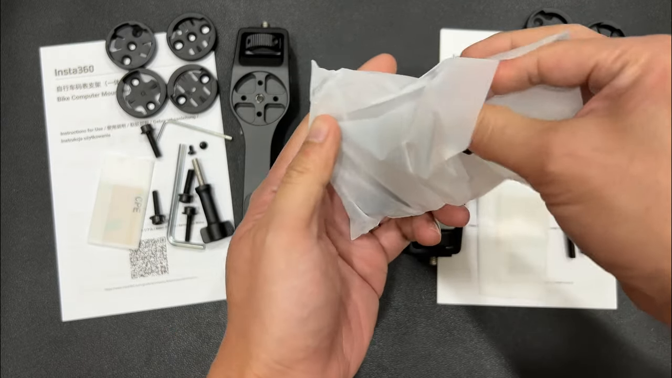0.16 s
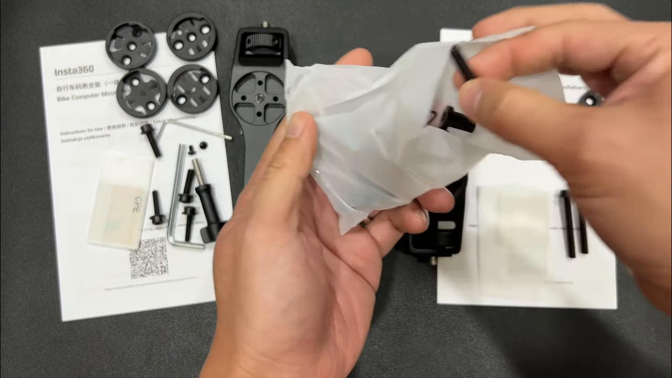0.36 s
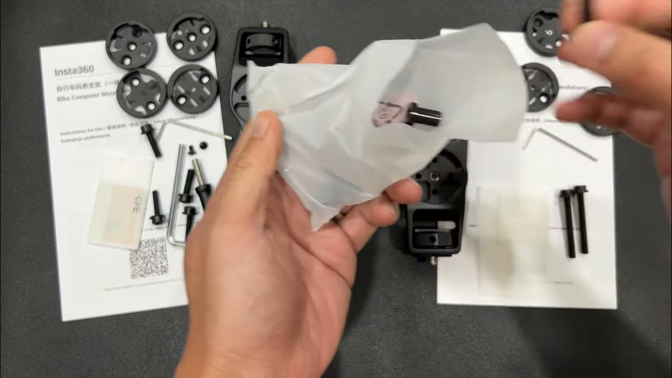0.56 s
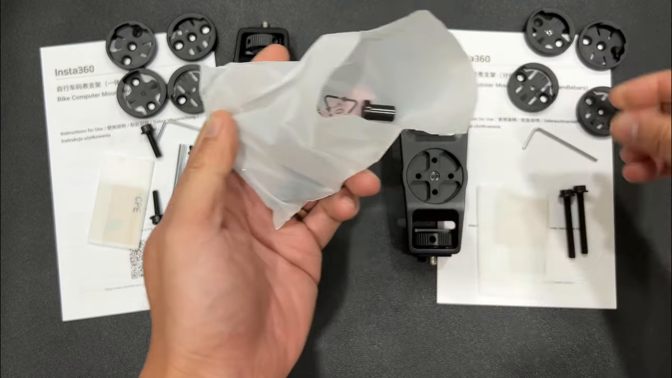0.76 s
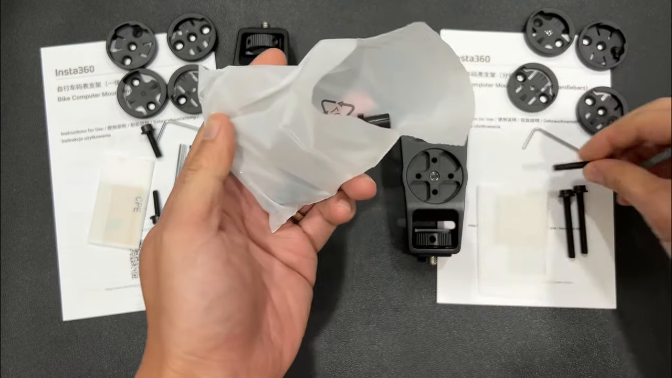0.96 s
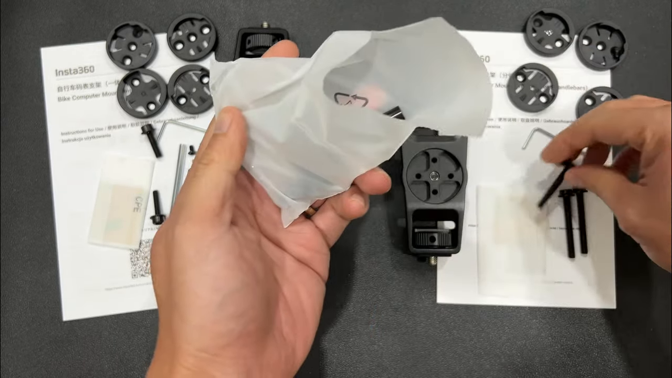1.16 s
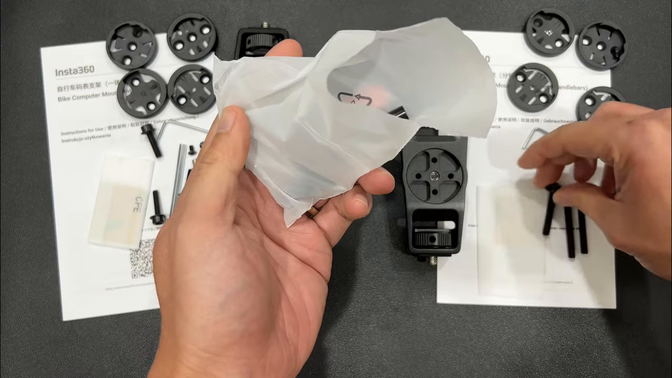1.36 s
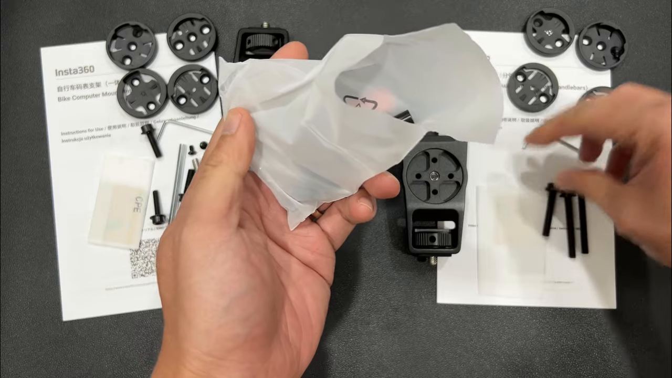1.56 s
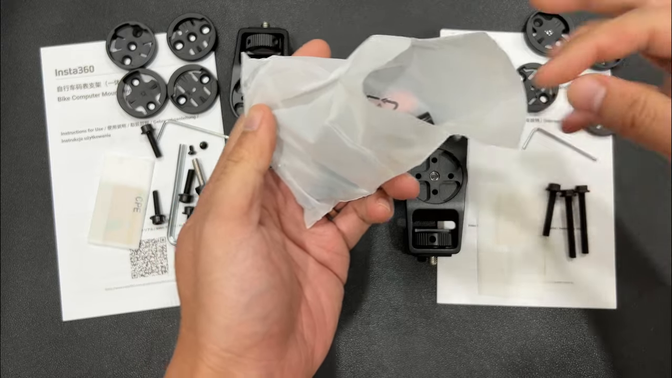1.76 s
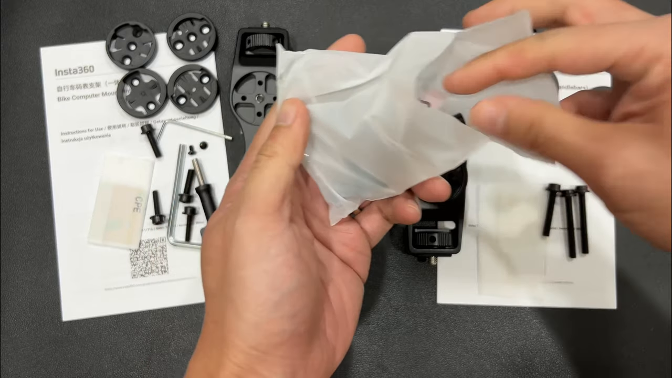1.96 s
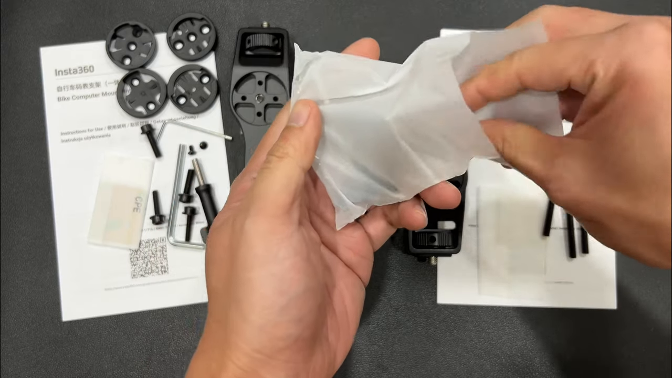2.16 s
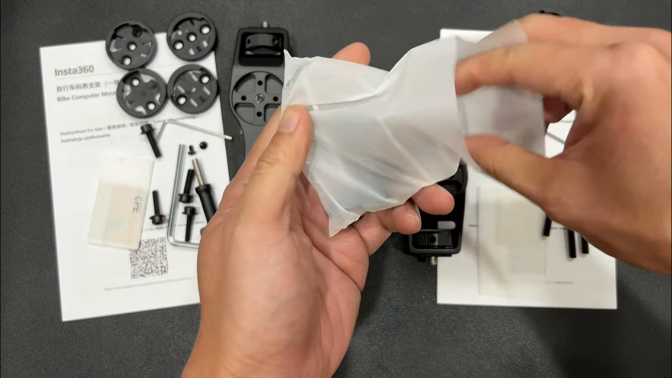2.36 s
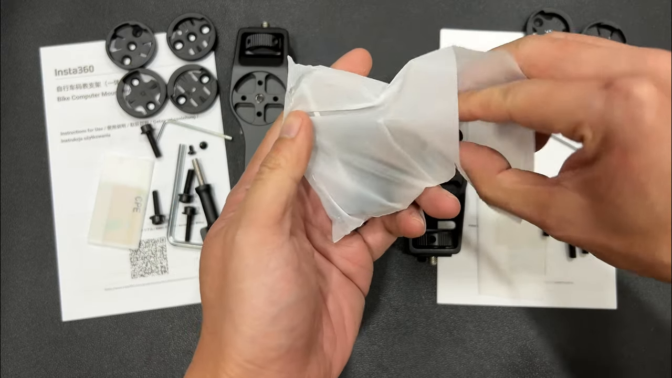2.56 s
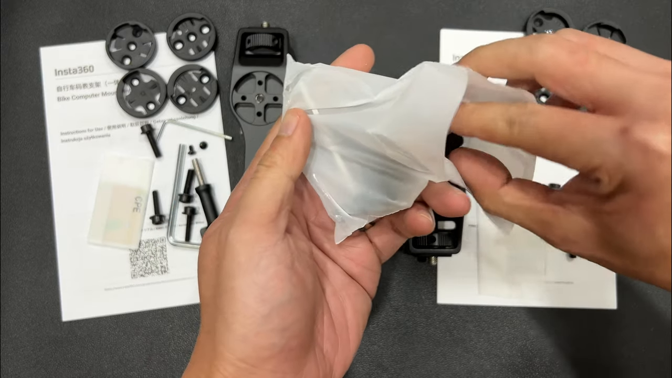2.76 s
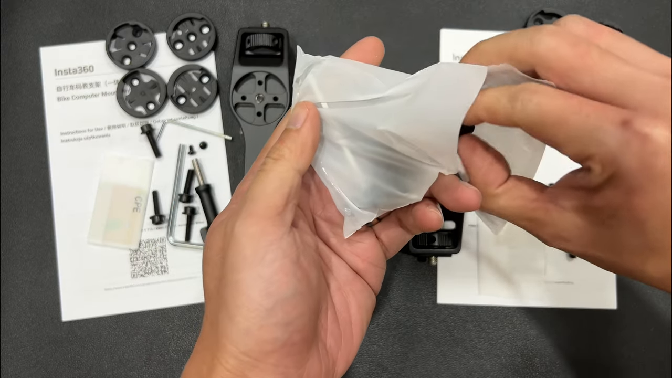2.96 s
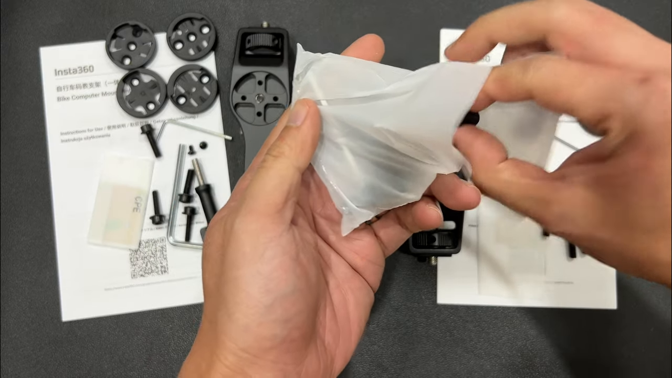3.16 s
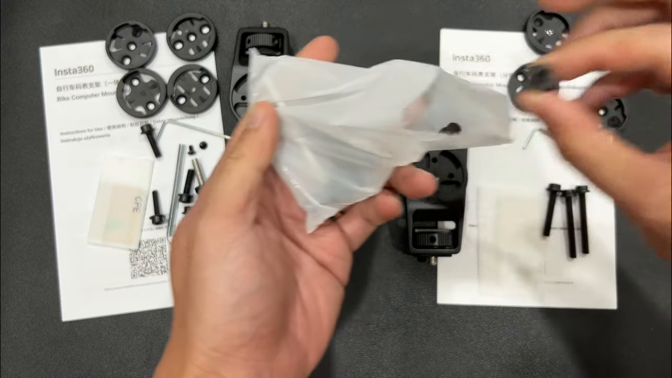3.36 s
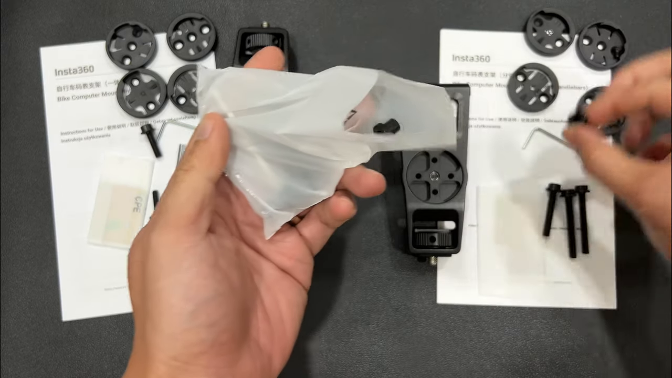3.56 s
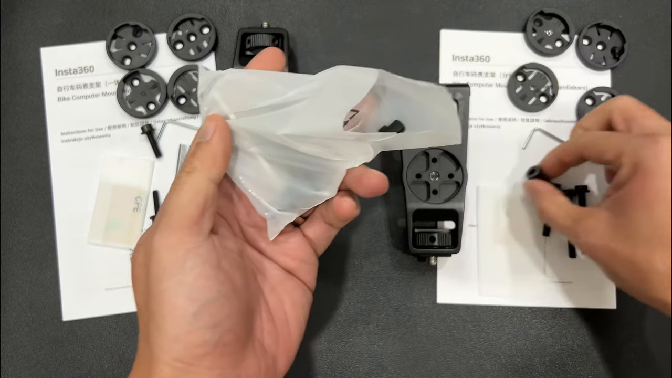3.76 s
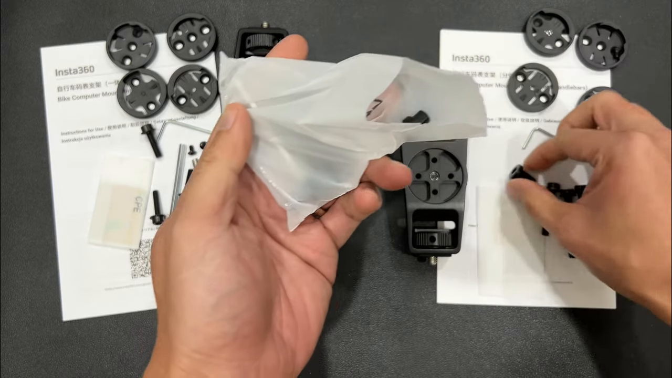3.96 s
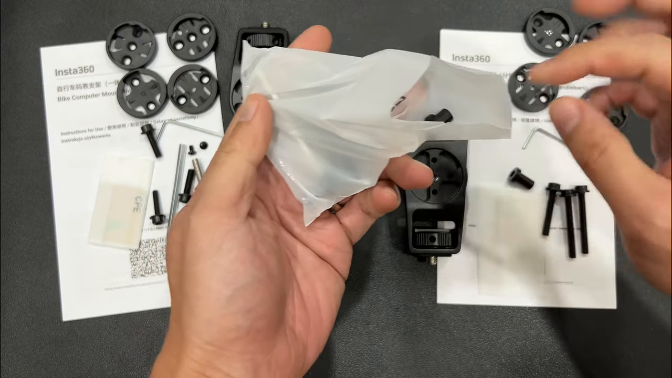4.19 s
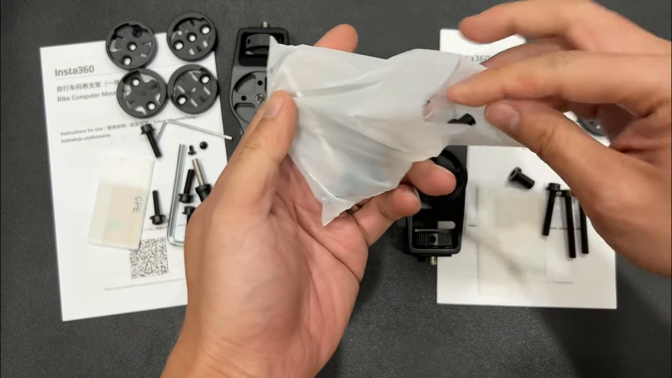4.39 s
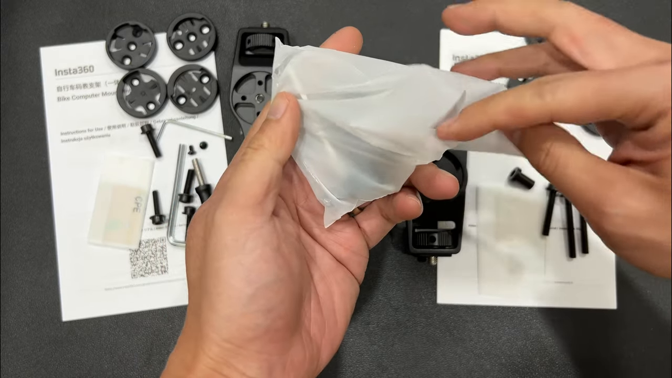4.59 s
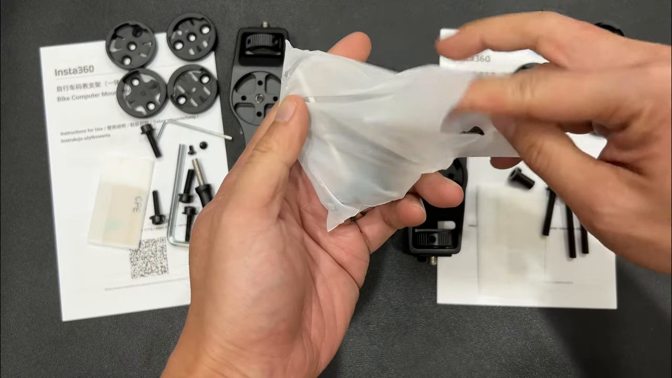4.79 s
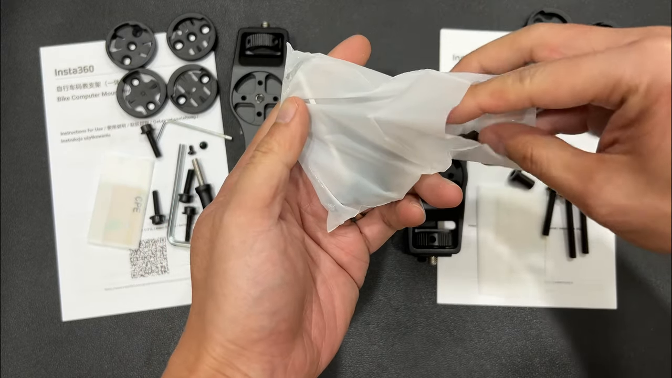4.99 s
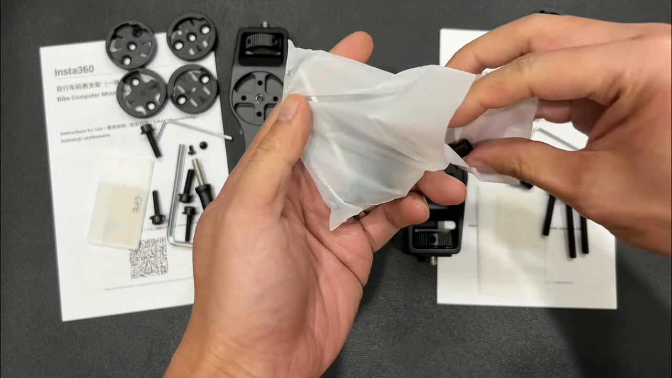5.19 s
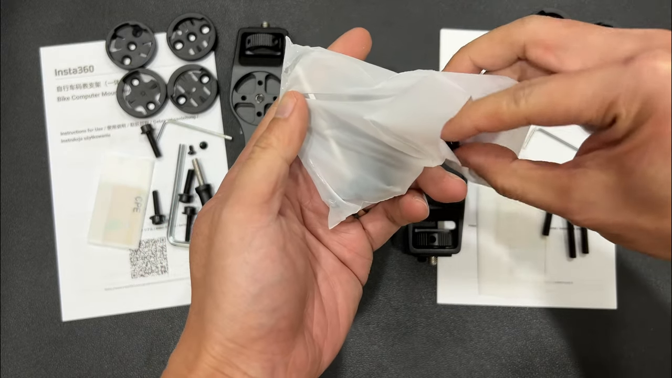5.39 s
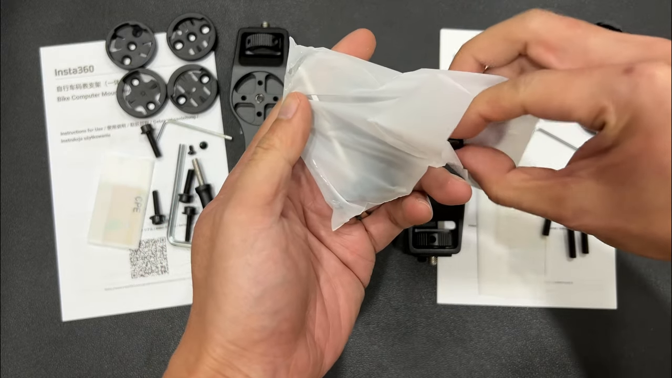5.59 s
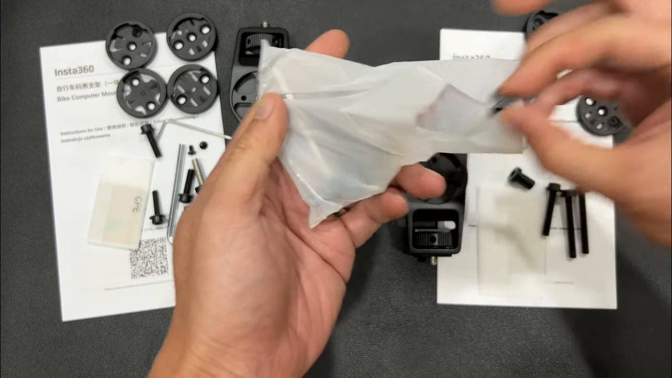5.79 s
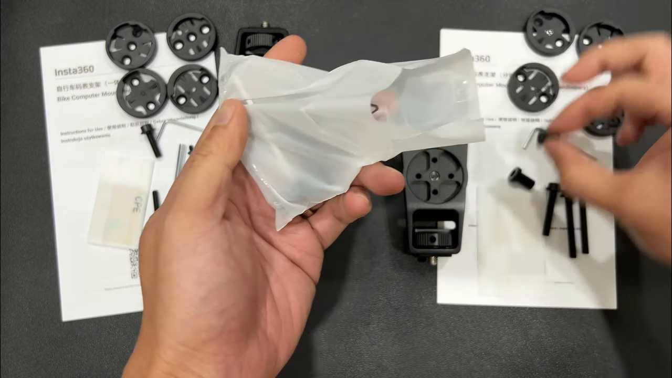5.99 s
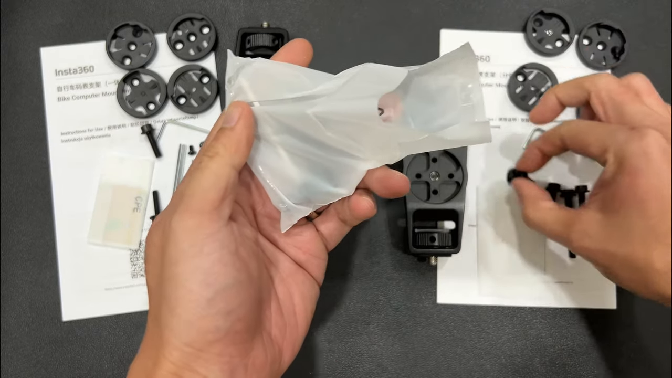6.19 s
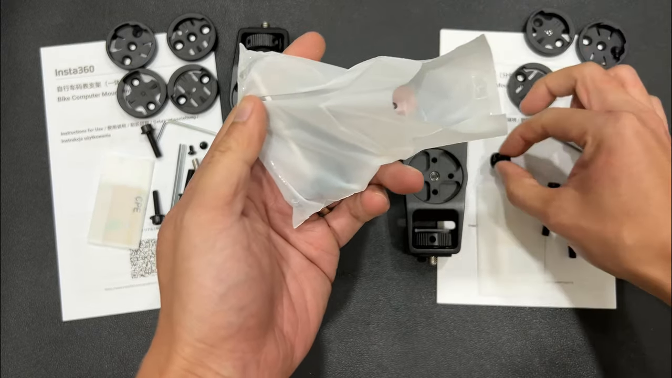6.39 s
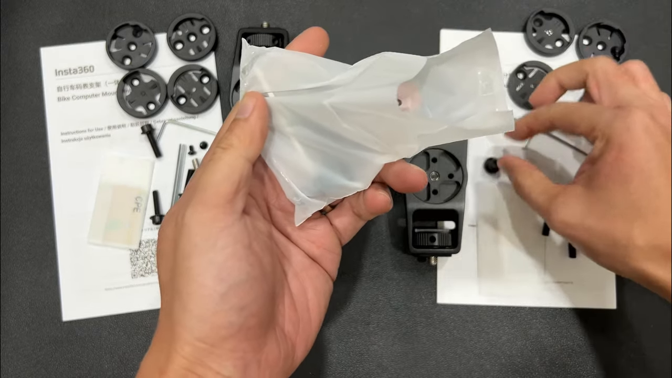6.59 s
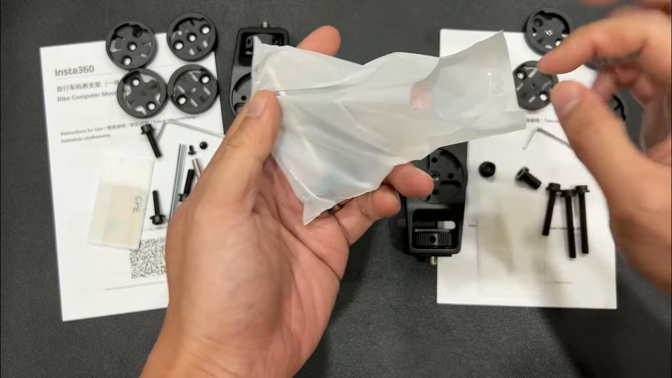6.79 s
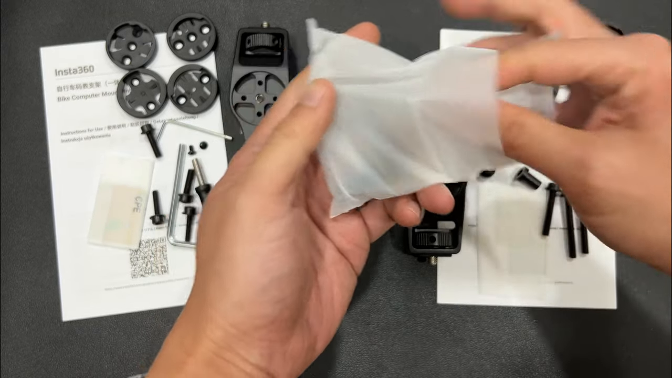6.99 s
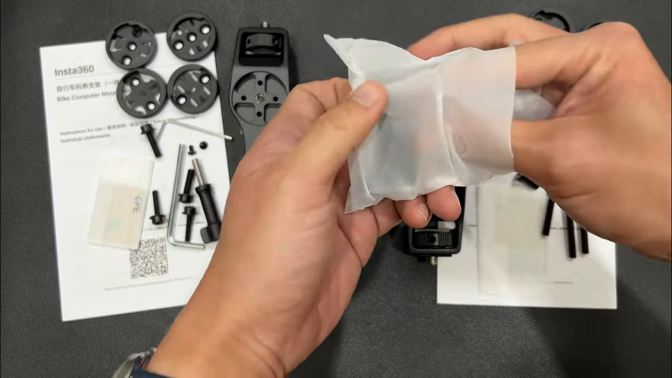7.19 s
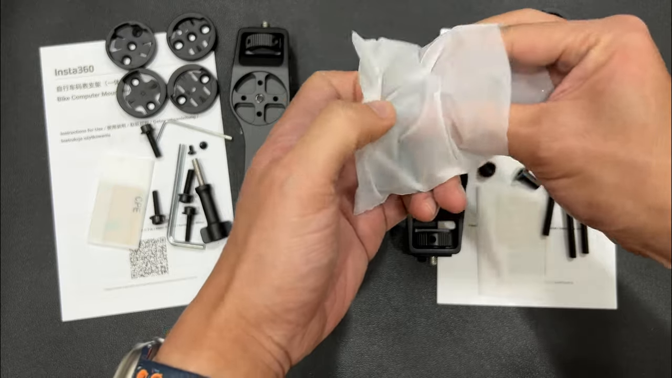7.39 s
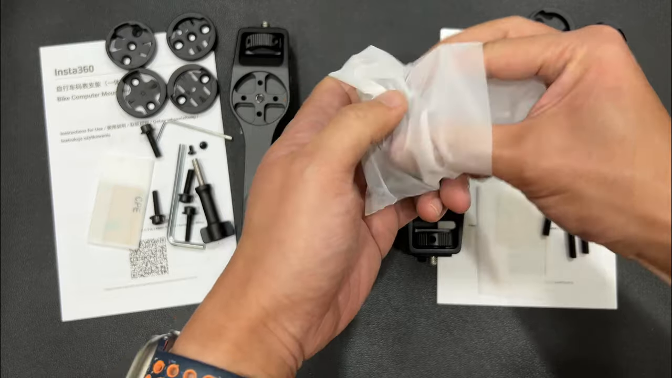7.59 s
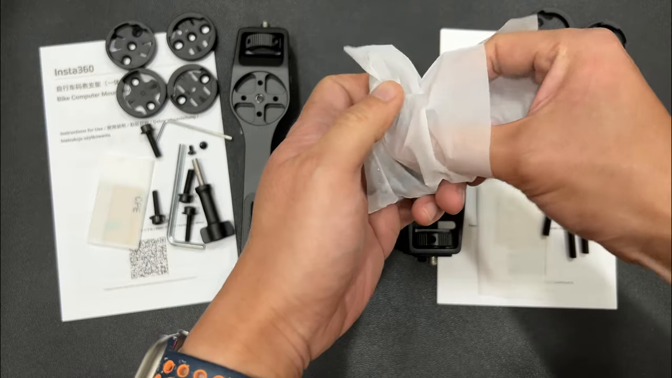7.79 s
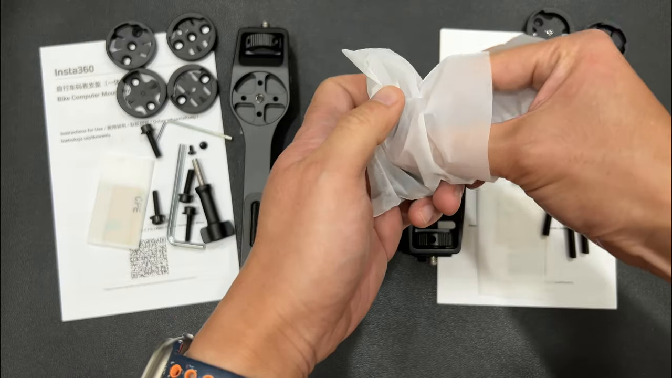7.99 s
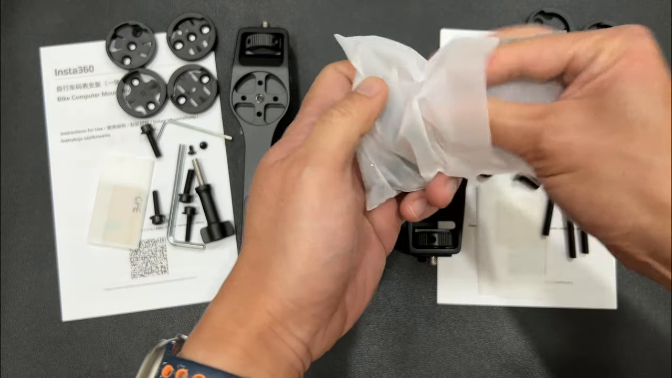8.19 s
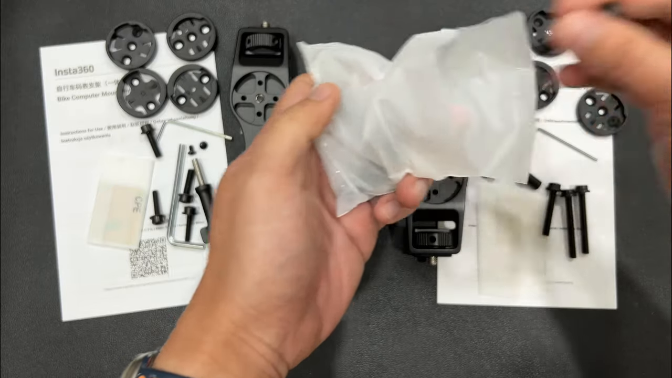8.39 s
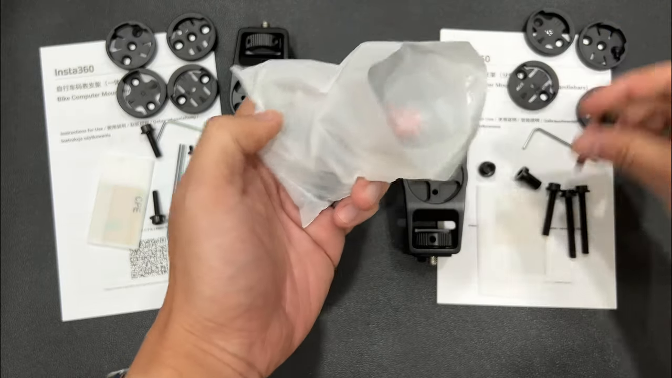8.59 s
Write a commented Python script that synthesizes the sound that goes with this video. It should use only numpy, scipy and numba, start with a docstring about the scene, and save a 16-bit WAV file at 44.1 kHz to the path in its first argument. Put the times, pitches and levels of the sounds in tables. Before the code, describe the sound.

Close to the microphone, fingers rummage in a thin plastic bag, making fine crackle and sharp snapping creases in several bursts. In the pauses, small steel bolts are laid on a paper-covered desk a little further off, with light ticks, dull thuds and one brief ring. The last burst is the busiest, with bolts clinking together inside the bag. A low hum of air fills the small furnished room.

```python
"""A small furnished room with a low, steady hum of air; a phone's two microphones close over a padded desk.
Just under the phone, fingers dig steel bolts out of a thin plastic bag: creases in the film snap over
a bed of fine crackle, the bag thumps now and then, and the bolts clink together. Laid down a little
further off, they tick on the desk's paper cover and thud. The room answers with a short tail."""
import sys
import numpy as np
from scipy import signal
from scipy.fft import rfft, irfft, next_fast_len
from scipy.io import wavfile
from scipy.ndimage import uniform_filter1d
from numba import njit

SR = 44100
rng = np.random.default_rng(int(sys.argv[2]) if len(sys.argv) > 2 else 0)


def unload_wav(signal):
    """Save mono or channel-first audio to the path in sys.argv[1] as 16-bit WAV at rate SR, clipped to [-1, 1]."""
    wavfile.write(
        sys.argv[1],
        SR,
        np.round(np.clip(np.atleast_2d(signal).T, -1, 1) * 32767).astype(np.int16),
    )


N = 381465
TIME = np.arange(N) / SR


def undb(db):
    return 10 ** (np.asarray(db) / 20)


def unit_rms(x):
    return x / np.sqrt(np.mean(x ** 2))


def along(table, hz):
    """Read (hz, value) points on a log-frequency axis."""
    table = np.array(table)
    return np.interp(np.log(np.maximum(hz, 1)), np.log(table[:, 0]), table[:, 1])


def colour(x, gain):
    """Filter the last axis by gain(hz)."""
    size = next_fast_len(x.shape[-1])
    hz = np.arange(size // 2 + 1) * SR / size
    return irfft(rfft(x, size) * gain(hz), size)[..., :x.shape[-1]]


def above(hz, corner_hz):
    """Steep high-pass gain."""
    return 1 / np.sqrt(1 + (corner_hz / np.maximum(hz, 1)) ** 8)


def below(hz, corner_hz):
    """Steep low-pass gain."""
    return np.sqrt(1 - above(hz, corner_hz) ** 2)


def band(x, centre_hz, octaves):
    """Keep a bell-shaped band of x."""
    return colour(x, lambda hz: np.exp(-(np.log2(np.maximum(hz, 1) / centre_hz) / octaves) ** 2))


@njit
def resonate(x, hz, q):
    """State-variable band-pass whose centre moves, gain 1 at the centre."""
    out, mid, low = np.empty(len(x)), 0., 0.
    for i in range(len(x)):
        g = np.tan(np.pi * hz[i] / SR)
        v = (mid + g * (x[i] - low)) / (1 + g * (g + 1 / q))
        mid, low = 2 * v - mid, low + 2 * g * v
        out[i] = v / q
    return out


def add(out, x, start_s):
    """Mix x into out from start_s."""
    i = max(int(start_s * SR), 0)
    out[..., i:i + x.shape[-1]] += x[..., :N - i]


def ring(hz, t60_s):
    """One decaying mode, cut at 0.3 s."""
    t = TIME[:int(.3 * SR)]
    return np.sin(2 * np.pi * hz * t) * np.exp(-np.log(1000) * t / t60_s)


def walk(per_s):
    """Glide between random values; spread near 1."""
    hold = int(SR / per_s)
    steps = np.repeat(rng.standard_normal(N // hold + 1), hold)
    return 1.2 * uniform_filter1d(steps, hold)[:N]


# Spectrum of the air in the room: freq_hz, relative_db
AIR_SPECTRUM = [(24, -46.5), (45, -13.5), (91, -2.5), (138, -8.5), (205, 0.5), (270, -8), (354, -11.5),
                (600, -24), (1270, -32.5), (2200, -36.5), (2900, -47), (9450, -54), (16000, -60)]
# Stereo width of diffuse sound at the phone: freq_hz, side_minus_mid_db
DIFFUSE_WIDTH = [(60, -25.5), (110, -15), (200, -17.5), (380, -7), (700, 6.5), (1290, -2), (2380, -8.5),
                 (4400, 4), (8120, -13.5), (15000, -7.5)]


def air(level_db=-56.5):
    """Moving air hums low all round the phone, faint hiss above, wavering slowly."""
    mid = colour(rng.standard_normal(N), lambda hz: undb(along(AIR_SPECTRUM, hz)))
    side = colour(rng.standard_normal(N),
                  lambda hz: undb(along(AIR_SPECTRUM, hz) + along(DIFFUSE_WIDTH, hz)))
    return np.array([mid + side, mid - side]) / np.std(mid) * undb(level_db + .6 * walk(5))


# The hand at work in the bag, one list of points per reach: time_s, crackle_db, flex_db
HAND_REACHES = [
    [(0, -54, -58), (.085, -44, -51.5), (.21, -60.5, -63.5), (.264, -49, -53.5), (.3, -56.5, -58),
     (.461, -58.5, -65), (.524, -74, -87)],
    [(.945, -74, -75), (.975, -66.5, -66), (1.017, -60, -56.5), (1.079, -85, -75)],
    [(1.85, -56, -73), (1.883, -49, -56.5), (1.97, -53, -69), (2.056, -47, -45.5), (2.1, -57, -54),
     (2.147, -46, -47.5), (2.3, -57, -66.5), (2.349, -47, -47.5), (2.5, -54.5, -58), (2.787, -61.5, -63.5),
     (2.814, -51, -51), (2.91, -62, -66.5), (3.259, -51.5, -51.5), (3.34, -56, -61), (3.41, -77, -72),
     (3.539, -90.5, -73.5), (3.62, -87, -72)],
    [(4.25, -70, -85), (4.294, -61, -57.5), (4.447, -51, -68.5), (4.532, -64.5, -66), (4.594, -55.5, -64),
     (4.79, -55.5, -70), (4.85, -60, -57.5), (5.029, -60, -63.5), (5.111, -54, -55.5),
     (5.311, -57.5, -66.5), (5.383, -52.5, -56.5), (5.56, -55.5, -59.5), (5.76, -47.5, -55.5),
     (5.83, -55, -64), (5.88, -82.5, -85)],
    [(6.905, -68, -60.5), (6.946, -53, -51.5), (7.061, -39, -48), (7.166, -51.5, -52), (7.256, -43.5, -48),
     (7.446, -41.5, -48), (7.498, -48.5, -50), (7.596, -44.5, -50), (7.707, -40, -46),
     (7.866, -53.5, -56.5), (7.962, -42, -49), (8.118, -59, -61.5)],
    [(8.12, -64, -65), (8.189, -41, -43), (8.225, -50, -54.5), (8.33, -55.5, -62), (8.42,  -81, -69.5),
     (8.504, -69, -62.5), (8.65, -47, -52)],
]


def handling():
    """Gains of fine crackle and slower flexing as the hand works; still between reaches."""
    crackling, flexing = np.zeros((2, N))
    for reach in HAND_REACHES:
        time_s, crackle_db, flex_db = np.transpose(reach)
        crackling += undb(np.interp(TIME, time_s, crackle_db, left=-120, right=-120))
        flexing += undb(np.interp(TIME, time_s, flex_db, left=-120, right=-120))
    return crackling, flexing


def crackle(per_s, life_s, slide_db):
    """Tiny buckles burst at random, a few much larger; sliding skin fills the gaps."""
    buckles = rng.random(N) < per_s / SR
    size_db = np.minimum(4 * rng.exponential(size=N), 20)
    burst = TIME[:800] * np.exp(-TIME[:800] / life_s)
    bursts = signal.fftconvolve(buckles * undb(size_db), burst)[:N]
    envelope = (unit_rms(bursts) + undb(slide_db)) / (1 + undb(slide_db))
    return envelope * rng.standard_normal((2, N))


def patches(x, depth_db):
    """Patches of film speak in turn: each third of an octave swells and fades alone."""
    centres_hz = 2500 * 2 ** (np.arange(9) / 3)
    return sum(band(x, hz, octaves=1 / 3) * undb(depth_db * walk(16)) for hz in centres_hz)


def spread(mid, other):
    """Short waves reach the two microphones by different paths, so the treble differs left and right."""
    side = colour(other, lambda hz: undb(-11) * above(hz, 4500))
    return np.array([mid + side, mid - side])


# Spectrum of the thin plastic from close up: freq_hz, relative_db
FILM_SPECTRUM = [(210, -21), (350, -7), (432, 2.5), (550, -5.5), (1060, 1), (1700, -3.5), (2350, -3.5),
                 (5000, -9), (6800, -4), (15200, -10.5), (16500, -28)]


def film_gain(hz):
    """How strongly the film radiates at each frequency."""
    return undb(along(FILM_SPECTRUM, hz))


# Air pocket between fingers and film: time_s, pitch_hz, strength_db
AIR_POCKET = [(0, 2650, 2), (1.9, 3500, 2), (2.2, 2360, 2), (3.4, 2360, 2), (4.2, 4100, 6), (5.05, 4100, 5),
              (5.12, 2100, 4), (5.8, 2000, 4), (6.9, 2600, 1), (8.65, 2400, 3)]


def rustle(flurry_crackle_db=-30.5, flurry_flex_db=-34.5):
    """Just under the phone the film crackles and flexes, coloured by the pocket; big folds push air."""
    time_s, pitch_hz, strength_db = np.transpose(AIR_POCKET)
    pocket_hz = np.interp(TIME, time_s, pitch_hz) * (1 + .04 * walk(14))
    pocket_db = np.interp(TIME, time_s, strength_db)
    slide_db = pocket_db + 1  # fingers that close the pocket slide more than they crumple
    fine = crackle(per_s=320, life_s=.0008, slide_db=slide_db)
    fine = colour(fine, lambda hz: film_gain(hz) * above(hz, 3500))
    flex = crackle(per_s=240, life_s=.0016, slide_db=slide_db)
    flex = colour(flex, lambda hz: film_gain(hz) * below(hz, 2800))
    folds = colour(rng.standard_normal(N), lambda hz: above(hz, 67) * below(hz, 320))
    crackling, flexing = handling()
    stirred = flurry()
    crackling = np.hypot(crackling, undb(flurry_crackle_db) * stirred)
    flexing = np.hypot(flexing, undb(flurry_flex_db) * stirred)
    film, other = unit_rms(patches(fine, depth_db=2.5)) * crackling + unit_rms(flex) * flexing
    pocket = resonate(film, pocket_hz, q=6.0) * undb(pocket_db)
    hollow_hz = 1080 * (1 + .07 * walk(7.2))  # the whole bag hums at a wandering pitch
    hollow = resonate(film, hollow_hz, q=7.9) * undb(-12)
    return spread(.74 * (film + pocket + hollow) + undb(-8) * unit_rms(folds) * flexing, other)


def cracks(rows, pitch_boost):
    """A crease flips, or steel lands: a pitched burst of about 2 ms, its low part a little later."""
    start_s, peak_db, pitch_hz, treble_db, low_db = np.array(rows).T[..., None]
    lead_s = 64 / SR  # space for the filters to ring ahead of the burst
    t = np.maximum(TIME[:1024] - lead_s, 0)
    noise = rng.standard_normal((len(rows), 3, len(t)))
    flip = (1 - np.exp(-t / .00035)) * (np.exp(-t / .00067) + .13 * np.exp(-t / .0046))
    swell = t * np.exp(-t / .0011)

    def spectrum(hz):
        resonance = 1 + pitch_boost / (1 + ((hz - pitch_hz) / (.13 * pitch_hz)) ** 2)
        tilt = undb(.76 * treble_db * (above(hz, 6900) ** 2 - .5))
        return film_gain(hz) * above(hz, 2100) * resonance * tilt

    crack = colour(noise[:, 0] * flip, spectrum)
    other = colour(noise[:, 2] * flip, spectrum)
    low = colour(noise[:, 1] * swell, lambda hz: film_gain(hz) * below(hz, 1400))
    low *= undb(low_db) * crack.std(axis=1, keepdims=True) / low.std(axis=1, keepdims=True)
    bursts = spread(crack + low, other) * undb(peak_db) / np.abs(crack).max(axis=1, keepdims=True)
    out = np.zeros((2, N))
    for k in range(len(rows)):
        add(out, bursts[:, k], start_s[k, 0] - lead_s)
    return out


# The clearest creases, close to the microphones; cracks() applies 0.76 of the treble tilt:
# start_s, peak_db, pitch_hz, treble_db, hollow_re_crack_db
CREASE_SNAPS = [(0.025, -22.5, 2500, 12, -8), (0.0881, -21, 2700, 2, -28), (0.1464, -25, 2320, 5, -2.5),
                (0.257, -35, 1950, -11, 0), (0.312, -36, 2100, -14, -10), (0.4293, -42, 2150, -17, -11),
                (0.555, -56, 3560, -20, 5), (0.58, -51, 1700, -4, 1.5), (0.6435, -68, 9000, 8, -15),
                (0.678, -62.5, 3500, -20, -8), (0.715, -63, 9500, 8, -20), (0.885, -62, 9000, 7, -18),
                (0.9677, -49, 7770, -15, 0), (1.013, -41, 2580, -1, -2), (1.8489, -43, 6480, 2, -14),
                (1.866, -30.5, 3160, 13, -11), (2.0598, -31.5, 2600, 4, -0.5),
                (2.1346, -21.5, 6040, -0.5, -0.5), (2.156, -25, 2330, 7, -16),
                (2.2338, -22, 2030, -2.5, -11), (2.3026, -21.5, 2460, 10, -7),
                (2.333, -13.5, 8000, 0.5, -12), (2.345, -22.5, 6740, -13, -16),
                (2.3562, -21.5, 3500, 10, -10), (2.3666, -26, 9090, -7, -8), (2.3882, -29, 2500, -1, -1),
                (2.3995, -24.5, 1990, -1.5, -14), (2.4104, -23, 2280, 1.5, -9), (2.416, -24, 1610, 14, 1.5),
                (2.454, -21.5, 2300, -7, -22), (2.5226, -23, 6500, 1, -10), (2.5298, -17, 6850, 11, -36),
                (2.5791, -32, 6600, 14, -12), (2.6732, -21, 4130, -1, -18), (2.8125, -29, 3030, 11, -5),
                (2.8759, -35, 3240, -2, 2), (2.9186, -27, 2300, 6, -1.5), (3.0224, -27, 2310, 3, -6.5),
                (3.1518, -33.5, 2210, -7, -6), (3.258, -35, 2400, 15, -11), (3.3319, -34.5, 2030, -42, 2),
                (3.513, -46.5, 2730, -14, -6), (3.5301, -40, 2230, 0, -15), (4.3501, -35.5, 5900, 4, -5),
                (4.598, -35, 4070, 1, -14), (4.804, -39, 4470, -15, -26), (4.857, -39, 4220, 0, -17),
                (4.8783, -33, 6800, -6, -7.5), (4.8966, -28, 4100, 10, -3.5), (4.9538, -26, 4000, -5.5, -6),
                (5.0996, -38.5, 4030, -20, 3), (5.1348, -36, 2210, -20, -5), (5.2059, -29, 3950, -2, -30),
                (5.3534, -31, 1860, -1, 1.5), (5.3744, -31, 8900, 23, -10), (5.3874, -28, 2000, -32, -8.5),
                (5.3985, -25.5, 4170, 17, -16), (5.4105, -27, 10960, -3, -25), (5.453, -28.5, 1910, -7, -4),
                (5.5042, -31.5, 8100, -1, -11), (5.534, -31.5, 2300, 3, -26), (5.581, -33, 11300, -1, -26),
                (5.611, -32, 7580, 3, -5), (5.6925, -31, 2000, -17, -2.5), (5.7105, -31, 10600, -5, -12),
                (6.9074, -33, 3400, -4, -12), (6.97, -33.5, 6560, 3, -20), (6.9913, -25.5, 6900, 17, -25),
                (7.0666, -27.5, 1610, 13, -2), (7.0954, -23.5, 8550, -1, -18), (7.1078, -26, 2760, 12, -18),
                (7.1154, -29, 2960, 9, -19), (7.1342, -29.5, 6700, -3, -6), (7.1491, -26.5, 3730, 2, -20),
                (7.1967, -23.5, 9100, -5.5, -5.5), (7.254, -27, 11150, -13, 0.5), (7.2148, -43, 7150, 0, 1),
                (7.291, -18.5, 7300, -19, -26), (7.3277, -25, 7900, -7, -14), (7.3492, -21.5, 3860, 9, -16),
                (7.3557, -21, 7160, 3, -8), (7.3909, -24, 11600, -1, -14), (7.4309, -23, 11300, 9, -29),
                (7.5127, -17.5, 10800, 0.5, -20), (7.5554, -24, 10800, -5, -26),
                (7.5727, -15.5, 6050, 20, -10), (7.5868, -17, 1770, -1, -12), (7.5983, -20, 11930, -5, -29),
                (7.6104, -25, 3200, -6, -6), (7.6706, -24, 2730, -2, -20), (7.6937, -20.5, 6500, 1, -18),
                (7.7223, -24.5, 2900, 11, -10), (7.8049, -24.5, 5770, 7, -10.5),
                (7.88, -28.5, 7560, 9, -33), (7.9056, -22, 6370, 5, -12), (7.926, -25.5, 7200, -13, -22),
                (7.944, -28, 2320, 2, -5), (7.9567, -22.5, 7700, 9, -29), (8.0208, -30.5, 8340, -4, -5.5),
                (8.2756, -30, 9400, -14, -8), (8.3752, -38.5, 3740, -30, -25), (8.4714, -42, 2870, -5, -3),
                (8.496, -32.5, 3620, 0, -30), (8.531, -29, 3540, -10, -18), (8.6108, -31.5, 6010, -14, -13)]


def snaps():
    """A crease flips: its facet rings and the hollow of the bag answers."""
    return cracks(CREASE_SNAPS, pitch_boost=2.8)


def flurry(fall_s=.021):
    """Gain of the crackle and flexing that each clear snap leaves dying away behind it."""
    power = np.zeros(N)
    decay = np.exp(-2 * TIME[:SR // 8] / fall_s)
    for start_s, peak_db, *_ in CREASE_SNAPS:
        add(power, undb(2 * peak_db) * decay, start_s)
    return np.sqrt(power)


def small_snaps(per_s=35):
    """Lesser creases flip at random, following the weaker of crackle and flexing at their moment."""
    gap, pitch = rng.random((400, 2)).T
    size, treble, hollow = rng.standard_normal((400, 3)).T
    start_s = np.cumsum(-np.log(1 - gap)) / per_s
    effort = np.interp(start_s, TIME, np.minimum(*handling()))
    peak_db = 20 * np.log10(effort) + 16 + 3.5 * size
    pitch_hz = 1900 * 2 ** (2.4 * pitch ** 2)
    treble_db, hollow_db = -2 + 5 * treble, -12 + 5 * hollow
    rows = np.column_stack([start_s, peak_db, pitch_hz, treble_db, hollow_db])
    return cracks(rows[start_s < N / SR], pitch_boost=1.5)


# Bolts touching down, further from the phone: start_s, peak_db, pitch_hz, treble_db, low_re_crack_db
BOLT_TICKS = [(1.4709, -37.5, 2320, -19, 1), (1.4985, -47.5, 7800, 3, 0.5), (1.507, -50, 7000, 10, -18),
              (3.7213, -43, 3330, -31, -13.5), (3.9211, -41, 2210, -4.5, -2.5), (3.943, -57, 8950, -1, -12),
              (6.0638, -40.5, 2690, -14.5, -11), (6.0709, -55, 2710.0, -12, 2.5),
              (6.3494, -42, 2070, -9.5, -10.5), (6.452, -54.5, 7000, -10, -3), (6.611, -54.5, 2860, -2, -6),
              (6.6497, -54.5, 3070, -8, -1)]


def ticks():
    """Steel lands on the desk's paper cover with a short tick."""
    return cracks(BOLT_TICKS, pitch_boost=2)


# Dull thuds, bolts landing on the desk and low thumps in the handled bag: start_s, level_db
DULL_THUDS = [(1.473, -23.5), (2.133, -37), (2.332, -37), (3.924, -28.5), (6.454, -40.5), (6.612, -38),
              (6.651, -36.5), (8.203, -35.5)]
# Low modes of the desk top, which voice every thud: pitch_hz, relative_db, t60_s
DESK_MODES = [(226.3, -15, 0.23), (289, 5, 0.06), (317, 3.5, 0.066), (419, -10.5, 0.24), (442, -8, .08)]


def thuds(push_s=.0017):
    """A soft push sets a few low modes swinging, mixed differently for each thud."""
    out = np.zeros(N)
    for start_s, level_db in DULL_THUDS:
        body = sum(undb(mode_db + 2.1 * rng.standard_normal()) * ring(hz, t60_s)
                   for hz, mode_db, t60_s in DESK_MODES)
        body = np.convolve(body, np.hanning(int(push_s * SR)))
        add(out, undb(level_db) * body / np.abs(body).max(), start_s)
    # a free panel radiates little below its lowest mode
    return signal.sosfilt(signal.butter(2, 170, "high", fs=SR, output="sos"), out)


# A bolt's upper and lower ringing tones, each a close pair that beats: pitch_hz, partner_hz
BOLT_TONES = [(11190, 11176), (6990, 7021)]
# Bolt against bolt: start_s, upper_db, lower_re_upper_db, t60_s
BOLT_CLINKS = [(1.509, -49.5, 5.5, 0.27), (4.006, -83, 19, 0.14), (7.247, -29.5, -30, 0.061),
               (7.281, -34, -27, 0.1), (7.336, -40, -25, 0.098), (8.148, -38, -24, 0.035),
               (8.159, -31, -19, 0.033), (8.173, -38, -25, 0.065), (8.184, -40, -18, 0.084),
               (8.201, -41, -25, 0.059), (8.2363, -28.5, -25, 0.025)]


def clinks():
    """Steel rings on thin lines: long when lying free, short when fingers or film hold it."""
    (upper_hz, upper_partner_hz), (lower_hz, lower_partner_hz) = BOLT_TONES
    out = np.zeros(N)
    for start_s, upper_db, lower_db, t60_s in BOLT_CLINKS:
        upper = ring(upper_hz, t60_s) - .23 * ring(upper_partner_hz, t60_s)
        lower = ring(lower_hz, .64 * t60_s) + .18 * ring(lower_partner_hz, .46 * t60_s)
        add(out, undb(upper_db) * (upper + undb(lower_db) * lower), start_s)
    return out


# Other small parts in the bag: start_s, peak_db, pitch_hz, t60_s
PART_PINGS = [(7.231, -45, 5600, 0.12), (7.438, -37, 2550, 0.091)]


def pings():
    """A small part rings briefly on one lone mode."""
    out = np.zeros(N)
    for start_s, peak_db, pitch_hz, t60_s in PART_PINGS:
        add(out, undb(peak_db) * ring(pitch_hz, t60_s), start_s)
    return out


# Level between the phone's microphones: freq_hz, left_minus_right_db
MIC_BALANCE = [(60, 0.0), (110, 0.0), (200, 0.0), (380, 1.5), (700, -3.5), (1290, 0.0), (2380, -0.5),
               (4400, 0.0), (8120, 0.0), (15000, 0.0)]
# Phase between them: freq_hz, left_lead_rad
MIC_PHASE = [(250, 0), (600, -.7), (950, .4), (1460, -.1), (2930, .1), (4390, .4), (5510, -.9),
             (7150, -1.3), (16000, -1.7)]


def microphones(x):
    """Each of the two microphones hears a near source with its own level and phase."""
    def half(hz):
        return undb(along(MIC_BALANCE, hz) / 2) * np.exp(1j * along(MIC_PHASE, hz) / 2)

    return np.array([colour(x[0], half), colour(x[1], lambda hz: 1 / half(hz))])


# Decay of the small furnished room: freq_hz, t60_s
ROOM_DECAY = [(200, 0.44), (1000, 0.3), (3000, 0.17), (8000, 0.38), (16000, 0.14)]


def room(x, build_s=.0078):
    """A diffuse tail, each band dying at its own rate; the bass is alike at both microphones."""
    t = TIME[:SR // 2]
    tail = 0
    for hz in 90 * 2 ** np.arange(0, 7.6, .5):
        mid, side = band(rng.standard_normal((2, len(t))), hz, octaves=.51)
        side *= undb(along(DIFFUSE_WIDTH, hz))
        reflected = undb(-2 * np.log2(1 + hz / 2000))  # soft furnishings send back less treble
        decay = np.exp(-np.log(1000) * t / along(ROOM_DECAY, hz))
        tail = tail + reflected * np.array([mid + side, mid - side]) * decay
    tail *= np.minimum(t / build_s, 1)
    tail /= np.sqrt(np.sum(tail ** 2) / 2)
    return signal.fftconvolve(x[None], tail, axes=1)[:, :N]


def scene():
    """Bag and desk reach the phone directly and again through the room, over the hum of air."""
    bag = rustle() + snaps() + small_snaps() + clinks() + pings()
    knocks = ticks() + thuds()
    into_room = undb(-19) * bag + undb(-11) * knocks  # wetter knocks: the desk is further off
    return microphones(bag + knocks) + room(into_room.mean(axis=0)) + air()


def record(dry):
    """The phone cuts the top above 16 kHz."""
    return signal.sosfilt(signal.ellip(8, .2, 70, 16000, fs=SR, output="sos"), dry)


dry = scene()
out = record(dry)
unload_wav(out)
```